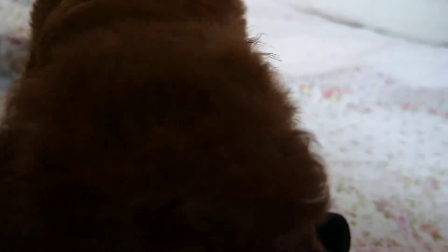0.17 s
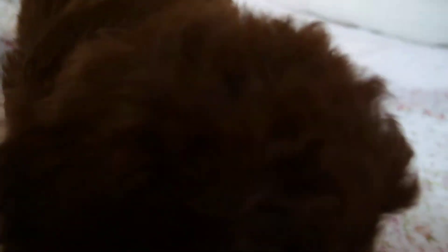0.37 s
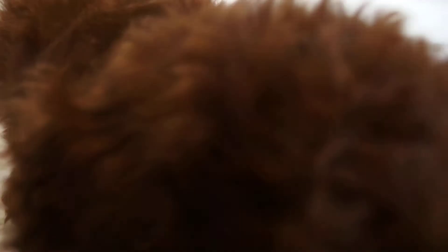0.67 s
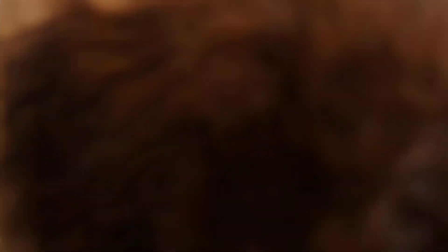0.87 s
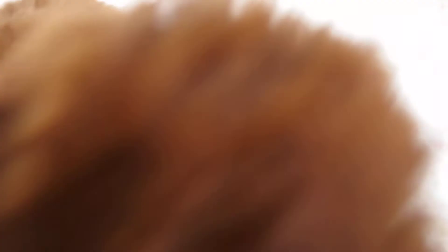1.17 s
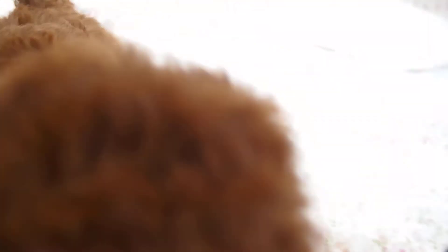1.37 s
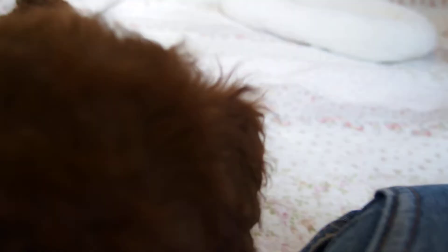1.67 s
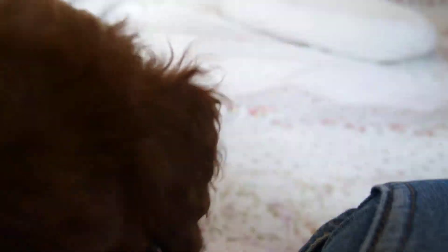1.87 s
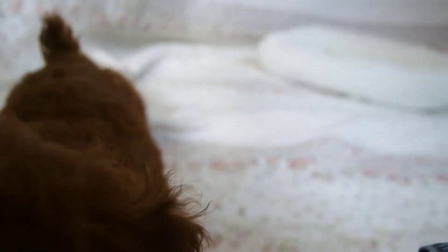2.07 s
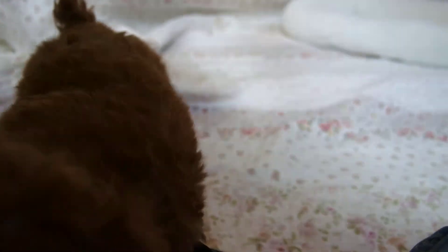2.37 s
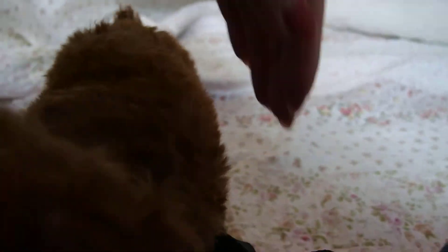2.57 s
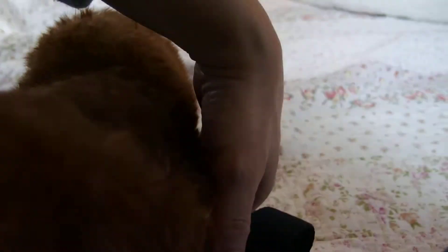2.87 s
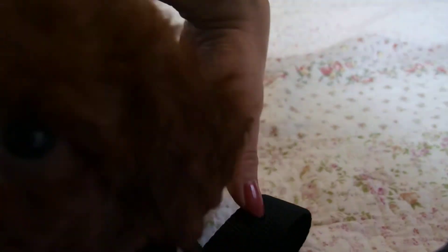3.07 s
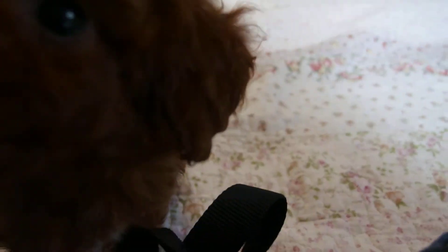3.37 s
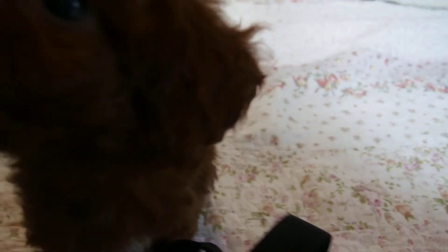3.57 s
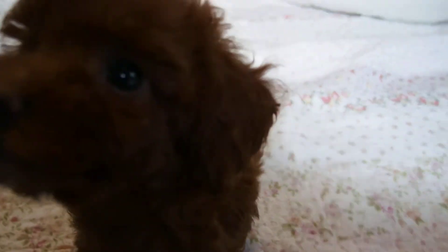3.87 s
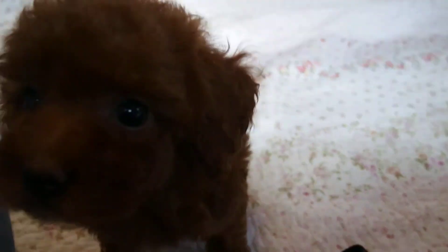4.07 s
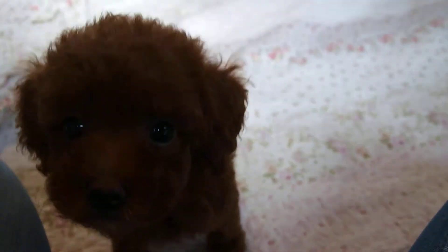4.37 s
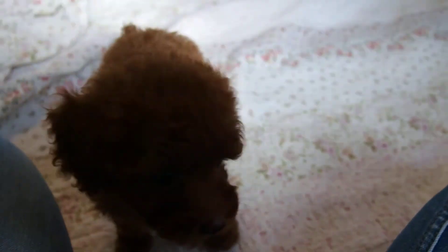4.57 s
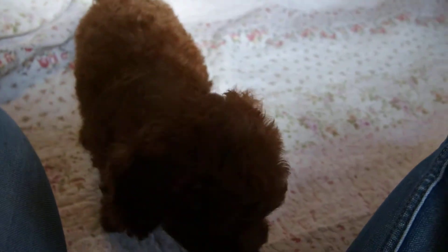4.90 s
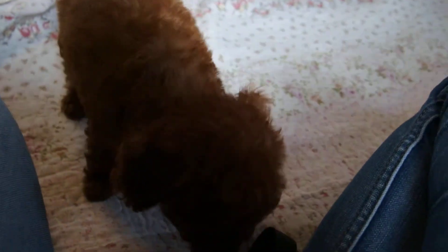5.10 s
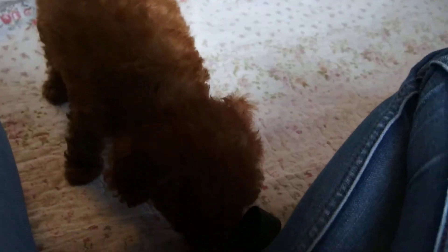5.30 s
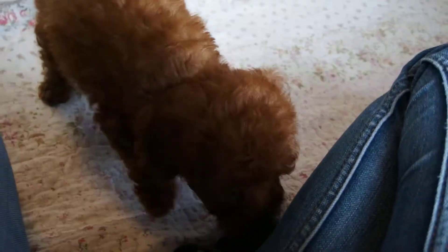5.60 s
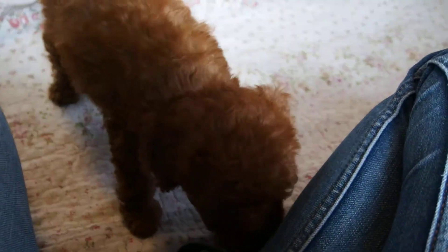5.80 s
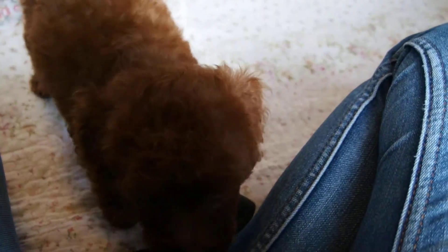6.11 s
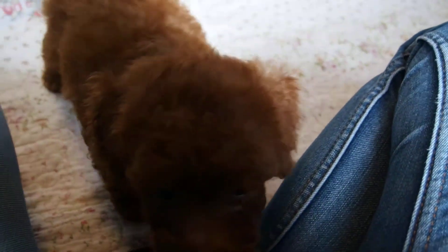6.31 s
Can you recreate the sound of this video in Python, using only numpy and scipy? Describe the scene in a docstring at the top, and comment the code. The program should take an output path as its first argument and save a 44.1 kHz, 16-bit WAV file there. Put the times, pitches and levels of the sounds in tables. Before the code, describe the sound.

Low wavering hum, faint hiss and rapid soft mechanical ticking lie beneath a small dog moving on bedding. Two sharp taps come early, then a heavy knock with a fur scrape and muffled paw thuds. Later the mouth pops wetly, and irregular hard bites click and scrape on a strap. The end is quieter, with light cloth rasp; dry indoor closeness, the level dipping after loud clicks.

```python
"""Puppy nibbling a strap

A puppy shuffles over a quilt beside a hand-held camera, brushes and knocks it, smacks its lips, bites
and pulls a strap, then rubs denim. Rubbing is grains over filtered noise; contacts are bursts through
resonators; pops and paw steps are enveloped sines. Motor hum, rumble, hiss, a whine, lens ticks and two
late thin tones run behind. Automatic gain ducks after sharp clicks."""
import sys
import numpy as np
from scipy import signal
from scipy.fft import rfft, irfft, next_fast_len
from scipy.io import wavfile
from scipy.ndimage import uniform_filter1d, map_coordinates

SR = 44100
rng = np.random.default_rng(int(sys.argv[2]) if len(sys.argv) > 2 else 0)


def int16_out(signal):
    """Quantize to a 16-bit WAV file."""
    q = np.round(np.clip(np.atleast_2d(signal).T, -1, 1) * 32767)
    wavfile.write(sys.argv[1], SR, q.astype(np.int16))


N = 284423
TIME = np.arange(N) / SR
HIT_SAMPLES = 2048
HIT_TIME = np.arange(HIT_SAMPLES) / SR

# stereo width of the room: f/Hz, side over mid/dB
ROOM_WIDTH = [(60, -8.5), (110, -19.5), (200, -14), (380, -11.5), (700, -6), (1290, -4), (2380, -2),
              (4400, -2), (8120, 0), (15000, 2.5)]
# strap pulled through the mouth: start/s, length/s, level/dB
PULLS = [(4.055, 0.0067, -37.5), (4.106, 0.023, -37.5), (4.166, 0.092, -43.5), (4.222, 0.053, -38.5),
         (4.334, 0.053, -44.5), (4.407, 0.12, -43), (4.859, 0.025, -39), (4.932, 0.045, -48),
         (5.05, 0.037, -49.5), (5.297, 0.034, -44), (5.673, 0.0066, -32), (5.834, 0.031, -37.5)]
# ring of the bitten strap: f/Hz, width/Hz, level/dB
STRAP_RING = [(3816, 520, 0)]
# low body of a bite: f/Hz, width/Hz, level/dB
NIP_BODY = [(584, 1010, 11), (1230, 530, 11.5), (3180, 356, 11.5)]


def from_db(db):
    """Decibels to amplitude gain."""
    return 10 ** (np.asarray(db) / 20)


def rms_one(x):
    """Scale to rms 1."""
    return x / np.sqrt(np.mean(x ** 2) + 1e-20)


def height_one(x):
    """Scale a hit so that its loudest millisecond has rms 0.5, a crest near 1."""
    return x / (2 * np.sqrt(uniform_filter1d(x ** 2, size=44).max()) + 1e-12)


def panned(pan_db):
    """Left and right gains; positive is left."""
    return from_db([[pan_db / 2], [-pan_db / 2]])


def at_hz(points, hz):
    """Read a spectrum on a log-frequency axis."""
    f, value = np.transpose(points)
    return np.interp(np.log(hz + 1), np.log(f), value)


def drift(knots_per_s):
    """Slow random curve of rms 1: straight lines between normal draws."""
    knots = rng.standard_normal(4000)
    return rms_one(np.interp(TIME * knots_per_s, np.arange(len(knots)), knots))


def stereo_noise():
    """Two independent white noises."""
    return rng.standard_normal((2, N))


def coloured(pair, colour, width):
    """Shape two excitations as mid and side by spectrum and width; left/right out at rms 1."""
    size = next_fast_len(N)
    hz = np.arange(size // 2 + 1) * SR / size + 0.0012
    low_hz, high_hz = colour[0][0], colour[-1][0]
    skirts = 1 / np.sqrt((1 + (low_hz / hz) ** 8) * (1 + (hz / high_hz) ** 8))
    mid, side = rfft(pair, size) * from_db(at_hz(colour, hz)) * skirts
    side = side * from_db(at_hz(width, hz))
    return rms_one(irfft([mid + side, mid - side], size)[:, :N])


def resonate(x, modes):
    """Parallel two-pole resonances (f/Hz, width/Hz, gain/dB) with alternating signs."""
    out = 0
    for k, (hz, width_hz, db) in enumerate(modes):
        r = np.exp(-np.pi * width_hz / SR)
        zeros = np.array([1, 0, -1]) * (1 - r * r) / 2
        poles = [1, -2 * r * np.cos(2 * np.pi * hz / SR), r * r]
        out = out + (-1) ** k * from_db(db) * signal.lfilter(zeros, poles, x)
    return out


def ring(slips, modes):
    """Modes at set relative rms levels, each a narrow then a wide resonance in series; rms 1."""
    out = 0
    for k, (hz, width_hz, db) in enumerate(modes):
        tone = resonate(resonate(slips, [(hz, width_hz, 0)]), [(hz, 4 * width_hz, 0)])
        out = out + (-1) ** k * from_db(db) * rms_one(tone)
    return rms_one(out)


def burst(decay_s, tail_db, rise_share):
    """A contact lets go in a quick run of tiny slips, with a faint trailing scuff."""
    decay_s = max(decay_s, 1e-4)
    snap = (1 - np.exp(-HIT_TIME / (rise_share * decay_s))) * np.exp(-HIT_TIME / decay_s)
    tail = from_db(tail_db) * np.exp(-HIT_TIME / 0.012)
    return rng.choice([-1, 1], HIT_SAMPLES) * (snap + tail)


def spurt(length_s, rise_share):
    """Random-sign jitter that swells and dies along Gaussian curves."""
    t = HIT_TIME / max(length_s, 5e-4)
    return rng.choice([-1, 1], HIT_SAMPLES) * (1 - np.exp(-(t / rise_share) ** 2)) * np.exp(-t ** 2)


def first_crack(slips, decay_s):
    """Weight the first instant of a contact, which excites the highest frequencies."""
    return slips * np.exp(-HIT_TIME / max(decay_s, 2e-4))


def chime(modes, length_s):
    """A soft push sounds each mode, a little off pitch every time, and dies away; rms 1."""
    tones = 0
    for hz, width_hz, db in modes:
        sung_hz = hz + 0.39 * width_hz * rng.normal()
        tones = tones + from_db(db) * np.sin(2 * np.pi * (sung_hz * HIT_TIME + rng.random()))
    swell = 1 - np.exp(-(HIT_TIME / 0.0048) ** 2)
    return rms_one(tones * swell * np.exp(-(HIT_TIME / max(length_s, 1e-3)) ** 2))


def add(out, s, hit, pan_db=0, lag_samples=0):
    """Place a hit at s seconds; the right channel lags the left."""
    i = max(int(s * SR), 0)
    late = map_coordinates(hit, [np.arange(len(hit)) - lag_samples], order=3)
    pair = np.array([hit, late]) * panned(pan_db)
    out[:, i:i + len(hit)] += pair[:, :max(N - i, 0)]


def strokes(rows, rise_db_per_s, fall_db_per_s):
    """Level in dB: each stroke rises, holds and falls; the strongest counts."""
    levels = []
    for s, length_s, db in rows:
        before_db = rise_db_per_s * np.maximum(s - TIME, 0)
        after_db = fall_db_per_s * np.maximum(TIME - s - length_s, 0)
        levels.append(db - before_db - after_db)
    return np.max(levels, axis=0).clip(-150, 0)


def rub(level_db, colour, grains_per_s, grain_db, smooth_db, flutter_db, pan_db):
    """Fibres catch and let go: uneven grains over a smooth hiss, under a fluttering pressure."""
    # stereo width of close rubbing: f/Hz, side over mid/dB
    rub_width = [(60, -5), (110, -13), (200, -29), (380, -36), (700, -22), (1290, -15), (2380, 1.5),
                 (4400, -2.5), (8120, 0), (15000, 5)]
    sizes = from_db(grain_db * np.minimum(rng.exponential(1, N), 2.5))
    caught = rng.random(N) < grains_per_s / SR
    grains = rms_one(sizes * caught * rng.choice([-1, 1], (2, N)))
    pressure = from_db(flutter_db * np.tanh(drift(130)))
    friction = (grains + from_db(smooth_db) * stereo_noise()) * pressure
    return from_db(level_db) * coloured(friction, colour, rub_width) * panned(pan_db)


def contacts(rows, ring_modes, body_modes, decay_s, detune=0):
    """Ring over low body; brightness adds upper ring and treble snap; a bite also rings the jaws."""
    # upper ring, treble snap, hollow of the jaws: f/Hz, width/Hz, level/dB
    upper_modes = [(5170, 1000, -11), (5450, 3800, -10)]
    treble_modes = [(7940, 1960, 6.5), (12400, 8200, 5)]
    jaw_modes = [(2180, 510, -0.5), (3020, 510, 1), (4420, 540, 1)]
    out = np.zeros((2, N))
    for s, db, body_db, bright_db, pan_db, *jaws in rows:
        slips = burst(decay_s, tail_db=-30.0, rise_share=0.091)
        body = from_db(body_db) * ring(slips, body_modes)
        pitch = 1 + detune * rng.uniform(-0.44, 1)
        tuned = [(hz * pitch, width_hz, g) for hz, width_hz, g in ring_modes]
        upper_db = -4 + 0.77 * bright_db
        top = from_db(2.5) * ring(slips, tuned) + from_db(upper_db) * ring(slips, upper_modes)
        top = top + from_db(bright_db) * ring(first_crack(slips, decay_s=.0008), treble_modes)
        scale = from_db(db) * np.std(height_one(top + body)) / np.std(top + body)
        add(out, s, scale * top, pan_db, lag_samples=1.6)
        # body further left than ring, jaws slightly further right
        add(out, s, scale * body, pan_db + 12, lag_samples=4.4)
        for jaw_db in jaws:
            add(out, s, scale * from_db(jaw_db) * ring(slips, jaw_modes), pan_db - 1, lag_samples=-3.5)
    return out


def bedroom(x, t60_s, wet_db, dull_hz):
    """A weak diffuse tail of decaying noise, dulled by the bedding."""
    t = TIME[:SR // 2]
    tail = rng.standard_normal((2, len(t))) * from_db(-60 * t / t60_s) * (t > .004)
    tail = signal.sosfilt(signal.butter(2, min(dull_hz, 18000), fs=SR, output="sos"), tail)
    tail /= np.sqrt(np.sum(tail ** 2) / 2)
    return x + from_db(wet_db) * signal.fftconvolve(x, tail, axes=1)[:, :N]


def background():
    """Wavering motor-hum partials, filtered-noise rumble and hiss, and a thin electronic whine."""
    # partials of two motors, before the swell: f/Hz, rms level/dB
    partials = [(42.03, -39), (34.6, -93), (64.64, -52), (72.1, -49.5), (81, -75), (99.55, -50),
                (202.5, -59.5), (313.6, -68.5), (360.5, -68.5)]
    # hum swell: t/s, gain/dB
    hum_swell = [(0, 5), (1.5, 0.5), (2.6, 2), (3.6, 2), (5.6, 1), (5.88, 0.5), (6.02, -4.5), (6.45, -2)]
    # room rumble; room air and microphone hiss: f/Hz, level per Hz/dB
    rumble_colour = [(20, -35), (32, 12.5), (52, -2.5), (68, 3), (85, 4.5), (102, 2), (122, -7), (175, -12),
                     (210, -5), (270, -17.5), (350, -19.5), (480, -48)]
    air_colour = [(240, -58), (400, 9.5), (520, 9), (708, 6.5), (1090, -0.5), (1220, 8), (1350, -9),
                  (1510, 1), (1820, -4.5), (2590, -8), (5190, -5), (8240, -12), (13900, -6), (15000, -7),
                  (16000, -2)]
    swell_s, swell_gain_db = np.transpose(hum_swell)
    swell_db = np.interp(TIME, swell_s, swell_gain_db)
    hum = 0
    for hz, db in partials:
        wavering_s = TIME + 0.00046 * drift(4.4)
        hum = hum + from_db(db) * np.sqrt(2) * np.sin(2 * np.pi * hz * wavering_s)
    rumble = from_db(-38.5) * coloured(stereo_noise(), rumble_colour, ROOM_WIDTH)
    air = from_db(-54.5) * coloured(stereo_noise(), air_colour, ROOM_WIDTH)
    whine = from_db(-66) * rms_one(resonate(stereo_noise(), [(15614, 26, 0)]))
    # rumble and air follow only the sinking part of the swell
    sink_db = 1.2 * np.minimum(swell_db, 0)
    return from_db(swell_db) * hum + from_db(sink_db) * (rumble + air) + whine


def quilt():
    """Shifting weight rumbles, crumples folds in surges and sets the hand-held camera booming."""
    # weight shifts: start/s, length/s, level/dB
    shifts = [(0, 1.7, -52), (.42, 0.099, -40), (1.7, 0.55, -36), (2.1, 0.92, -37.5), (3.05, 0.95, -48),
              (6.21, 0.01, -40.5)]
    # rumble and fold spectra: f/Hz, level per Hz/dB
    shuffle_colour = [(65, -23), (110, -4), (167, -3), (274, -12.5), (310, -12), (393, -23), (712, -30),
                      (1030, -32), (1240, -37), (1850, -36.5), (1980, -52), (2370, -40.5), (3000, -45.5),
                      (3900, -63), (6600, -120)]
    fold_colour = [(280, -0.5), (700, 0.5), (1250, -5), (2000, -24)]
    level_db = strokes(shifts, rise_db_per_s=136, fall_db_per_s=96)
    surge = np.tanh(drift(28))
    surging = stereo_noise() * from_db(5.3 * surge)
    boom = rms_one(resonate(resonate(surging[0], [(176.0, 18, 0)]), [(154, 31, 0)]))
    rumble = from_db(-2.5) * coloured(surging, shuffle_colour, ROOM_WIDTH) + from_db(-25.0) * boom
    folds = rub(level_db - 17 + 3.5 * surge, fold_colour, grains_per_s=42, grain_db=2.0,
                smooth_db=9.5, flutter_db=-2.5, pan_db=-1.5)
    return from_db(level_db) * rumble * panned(1.8) + folds


def focus():
    """The lens hunts in about fifteen small steps a second; each rings its barrel."""
    # runs of steps: start/s, level/dB, middle modes/dB, 860 Hz knock/dB
    runs = [(0, -43, 2.5, -2), (1.15, -42.5, -3, -2), (3.0, -43, -10.5, 0), (3.7, -41, -5, -2.5),
            (5.95, -75, -8, 4)]
    # barrel modes: f/Hz, width/Hz, level/dB
    low_modes = [(689, 122, -4.5), (860, 170, -4.5)]
    middle_modes = [(1302, 204, 8.5), (1865, 170, 3)]
    high_modes = [(2326, 34, 6.2), (3480, 780, 12.6), (5550, 1400, 6.3)]
    # louder steps with a stronger knock: t/s
    loud_steps = [3.173, 3.306]
    first_s, step_s = .036, .06674
    out = np.zeros((2, N))
    for s in np.arange(first_s, N / SR, step_s):
        _, db, middle_db, knock_db = runs[sum(s >= run[0] for run in runs[1:])]
        loud_db = 7 * any(abs(s - loud_s) < step_s / 2 for loud_s in loud_steps)
        push = spurt(0.018, rise_share=0.13)
        knock = from_db(knock_db + loud_db / 2) * ring(push, low_modes[1:])
        low = rms_one(chime(low_modes[:1], length_s=0.021) + knock)
        middle = from_db(middle_db) * chime(middle_modes, length_s=0.011)
        high = from_db(-6.5) * ring(push, high_modes)
        add(out, s, from_db(db + loud_db) * height_one(low + middle + high), pan_db=4.0)
    return out


def after_ring(hz):
    """A thin sine of rms near 1 at its start hangs on after a pop and dies away."""
    t = TIME[:SR // 3]
    t60_s = .26
    return np.sqrt(2) * np.sin(2 * np.pi * hz * t) * (1 - np.exp(-t / .004)) * from_db(-60 * t / t60_s)


def smacks():
    """Lips part with a soft thump: the mouth cavity pops while the wet film bursts brightly."""
    # t/s, level/dB, mouth f/Hz, spray/dB, spray f/Hz, thump/dB, 5 kHz ring/dB, left-right/dB
    smack_rows = [(0.393, -47, 2320, 3.5, 9700, -20, -6, 0), (0.502, -44, 2120, 3, 9900, -24, -8, -1),
                  (3.816, -12, 1925, 3.5, 9200, -15.5, -4.5, 2.5),
                  (3.957, -37, 2380, -20.5, 9500, -4, -28, -4),
                  (3.9861, -14.5, 1810, 5, 9440, -14, -11.5, 3),
                  (3.9884, -18, 2270, -8, 9600, -13, -19, -3), (4.628, -39, 1850, -14, 9650, 0, -21, 0.5),
                  (4.7649, -9, 1523, -7, 9900, -11.5, -21.5, 0),
                  (4.881, -26.5, 1840, -12, 11220, -5, -26, -12),
                  (4.889, -25, 1600, -15, 11300, -5, -30, 8),
                  (4.8917, -15.5, 1730, -9.5, 11400, -11, -40, -3),
                  (4.895, -25, 1180, -9, 11300, -3.5, -25, -2)]
    sag, sag_s, pop_cycles = 0.055, 0.00047, 7.3
    out = np.zeros((2, N))
    for s, db, mouth_hz, spray_db, spray_hz, thump_db, high_ring_db, pan_db in smack_rows:
        film = spurt(length_s=0.0054, rise_share=0.016)
        # pitch starts sharp and settles as the mouth opens
        turns = mouth_hz * (HIT_TIME + sag * sag_s * (1 - np.exp(-HIT_TIME / sag_s)))
        pop_shape = (1 - np.exp(-HIT_TIME / 0.00031)) * np.exp(-(turns / pop_cycles) ** 2)
        pop = rms_one(np.sin(2 * np.pi * turns) * pop_shape)
        cavity = pop + from_db(-11) * ring(film, [(mouth_hz, 750, 0)])
        thump = from_db(thump_db) * ring(film, [(654, 580, 0)])
        high_ring = from_db(high_ring_db) * ring(film, [(5130, 280, 8.5), (6280, 310, 0.5)])
        spray_modes = [(spray_hz, 1700, 0), (12700, 1700, -8)]
        spray = from_db(spray_db) * ring(first_crack(film, decay_s=0.0027), spray_modes)
        scale = from_db(db) * np.std(height_one(cavity))
        add(out, s, scale * (cavity + thump), pan_db, lag_samples=0.29)
        add(out, s, scale * (high_ring + spray), pan_db, lag_samples=0.8)
        add(out, s, scale * from_db(-18) * after_ring(1.03 * mouth_hz), pan_db)
    return out


def paws():
    """A paw sinks in slowly and the mattress booms: a wavering sine under a Gaussian swell."""
    # time of maximum/s, peak/dB, f/Hz, Gaussian length/s
    steps = [(.51, -31, 164, 0.027), (1.66, -33.5, 156, 0.043), (1.77, -32.5, 159, 0.035),
             (1.96, -33.5, 162.5, 0.16), (2.167, -27, 117, 0.015), (2.38, -39, 169.1, 0.13),
             (2.402, -37, 221, 0.016), (2.562, -37, 222, 0.017), (2.96, -49, 177, 0.015)]
    out = np.zeros((2, N))
    for s, db, hz, length_s in steps:
        t = TIME - s
        boom = np.sin(2 * np.pi * hz * t + 0.31 * drift(30) + rng.uniform(0, 2 * np.pi))
        out += from_db(db) * boom * np.exp(-(t / length_s) ** 2)
    return out


def fur():
    """Fur brushes the camera in fine grains; hard strokes add a treble sizzle."""
    # brush strokes: start/s, length/s, level/dB
    brushes = [(.515, 0.012, -61), (1.345, 0.04, -52.5), (1.62, .09, -51.5), (1.72, .05, -48),
               (1.812, 0.041, -35), (2.03, .04, -53), (2.18, 0.24, -47.5), (2.84, 0.13, -58)]
    # fur and sizzle spectra: f/Hz, level per Hz/dB
    fur_colour = [(530, -33), (900, -35), (1790, -2.5), (2190, -12.5), (3150, -9), (3910, 0.5), (4310, -5),
                  (5280, -3.5), (8660, -18), (9880, -13.5), (13200, -23), (15100, -20), (16000, -55)]
    sizzle_colour = [(6500, 0), (10000, -3), (15000, -6)]
    brush_db = strokes(brushes, rise_db_per_s=236, fall_db_per_s=760)
    brushing = rub(brush_db, fur_colour, grains_per_s=2600, grain_db=-4.5,
                   smooth_db=-9.5, flutter_db=4.0, pan_db=-1.5)
    sizzle_db = -39.5 + 1.53 * (brush_db - brush_db.max())
    sizzle = rub(sizzle_db, sizzle_colour, grains_per_s=8200, grain_db=7.0,
                 smooth_db=-9, flutter_db=4.0, pan_db=5.0)
    return brushing + sizzle


def ticks():
    """Claws and teeth tick against the camera as hard contacts."""
    # t/s, level/dB, body/dB, brightness/dB, left-right/dB
    tick_rows = [(1.0072, -34.5, 2, -12, -13), (1.1155, -4, -9.5, 1, 3.5), (1.2091, -11, -10.5, -3.5, -5),
                 (1.7644, -25.5, -2.5, -25, -8), (1.826, -11, -1, -17, -7), (2.0985, -25.5, 16, -32, -16),
                 (2.1512, -28, 11, 6, -3), (3.629, -39, -20, 20, 14), (6.027, -43.5, -25, -1, -4)]
    # ring and body: f/Hz, width/Hz, level/dB
    tick_ring = [(3910, 290, 1), (5330, 810, 0)]
    tick_body = [(393, 1160, 5.5), (1380, 1840, 8.5), (2510, 450, 6.5)]
    return contacts(tick_rows, tick_ring, tick_body, decay_s=0.0014)


def bumps():
    """Dull knocks boom the camera shell, with a rattle of higher modes and a scuff of fur."""
    # t/s, level/dB, resonance/Hz, left-right/dB, decay/s, scuff/dB
    bump_rows = [(1.1137, -27, 320, 17, 0.0004, -22), (1.2095, -30, 620, -12, 0.00081, -1),
                 (1.587, -34.5, 540, -0.5, 0.0016, 17), (1.826, -15.5, 674, 4.5, 0.0017, -28),
                 (2.097, -33, 640, 10, 0.003, 7), (2.151, -32, 750, 10, 0.0033, 3),
                 (2.834, -33, 490, 2, 0.0025, 1), (3.643, -30, 526, -3, 0.0018, 0),
                 (3.718, -41.5, 850, 6, 0.0017, -15), (6.1, -41, 666, 5, 0.0035, 3),
                 (6.212, -44, 774, 16, 0.0038, 0), (6.226, -33, 723, 7, 0.0015, 1),
                 (6.269, -49, 1000, 12, 0.0027, -5)]
    # shell modes: multiple of the resonance, width/Hz, level/dB
    shell = [(1, 115, 6), (1.1, 600, -1), (2.62, 164, -13), (3.6, 200, -9)]
    # scuff: f/Hz, width/Hz, level/dB
    scuff_modes = [(450, 220, 5.5), (980, 780, -1)]
    out = np.zeros((2, N))
    for s, db, hz, pan_db, decay_s, scuff_db in bump_rows:
        shape = (HIT_TIME / decay_s) ** 2 * np.exp(-HIT_TIME / decay_s)
        boom = rms_one(np.sin(2 * np.pi * hz * HIT_TIME) * shape)
        shell_modes = [(hz * ratio, width_hz, g) for ratio, width_hz, g in shell]
        rattle = ring(burst(decay_s, tail_db=-17, rise_share=0.98), shell_modes)
        scuff = from_db(scuff_db) * ring(spurt(length_s=0.011, rise_share=0.22), scuff_modes)
        add(out, s, from_db(db) * height_one(boom + from_db(-7.0) * rattle + scuff), pan_db)
    return out


def wander(x, share, knots_per_s):
    """The strap tightens and slackens: a varying playback rate slides its whole colour."""
    highpass = signal.butter(1, 2, "high", fs=SR, output="sos")
    speed = signal.sosfilt(highpass, drift(knots_per_s))
    at = np.arange(N) + share * np.cumsum(speed)
    return np.array([map_coordinates(side, [at], order=3) for side in x])


def strap(pull_db):
    """The strap slides through the mouth: sparse fibre grains over hiss, wandering in pitch."""
    # f/Hz, level per Hz/dB
    drag_colour = [(1290, -14), (2200, -16), (2750, -18), (3280, -1.5), (3900, 3.5), (4450, -3),
                   (5200, -13), (5700, -12), (7210, -18), (9480, -15.5), (10400, -19), (16000, -24)]
    sliding = rub(pull_db, drag_colour, grains_per_s=450, grain_db=-3.5,
                  smooth_db=-4, flutter_db=3.0, pan_db=-4.5)
    return wander(sliding, share=.04, knots_per_s=25)


def snags(pull_db, count):
    """Faint contacts at random moments, levels following the pull, each at its own pitch."""
    times = rng.uniform(PULLS[0][0], PULLS[-1][0], count)
    levels_db = np.interp(times, TIME, pull_db) + 8 + 3 * rng.uniform(-0.87, 1, count)
    body_db, bright_db, pan_db = -13.0, -7, -1
    rows = [(s, db, body_db, bright_db, pan_db) for s, db in zip(times, levels_db)]
    return contacts(rows, STRAP_RING, NIP_BODY, decay_s=0.0014, detune=.2)


def nips():
    """Teeth bite the strap: its ring, a low body and the hollow of the jaws."""
    # t/s, level/dB, body/dB, brightness/dB, left-right/dB, jaw ring/dB
    nip_rows = [(4.166, -31, -20, -2.5, 2, -22), (4.2372, -25, -22, -9, 7.5, -19),
                (4.3164, -31.5, -9, -6, -6, -14), (4.3525, -28.5, -22, 2, -6, -16),
                (4.447, -33, -14, 6.5, -2, -20), (4.465, -40, -20, 4, 2, -22),
                (4.503, -32, -20, 6, -7, -28), (4.5984, -35.5, -22, -3, -6, -26),
                (4.8494, -26, -6, -23, -7, -9), (4.9544, -27, -18, -1, -5, -18),
                (5.01, -32.5, -16, -2, -3, -17), (5.0383, -22, -15, -1, -4, -22),
                (5.0981, -27, -11, -18, -4, -26), (5.154, -25, -30, 3, 7, -20),
                (5.163, -14, -12, 5, -5, -16), (5.1873, -6, -16.5, 11, -3, -5.5),
                (5.1972, -27, -4, 3, 0, -15), (5.2128, -33, -10, -5, 0, -18), (5.2688, -39, -20, 1, 0, -22),
                (5.298, -23, -6, -8, 6, 4), (5.3005, -11, -15.5, -28, -3, -3),
                (5.3102, -32, -3, -19, 3, -2), (5.325, -30, -12, 12, -8, -7),
                (5.3513, -8.5, -13, -9.5, -3.5, -1), (5.4526, -20.5, -12, -2, 0, -40),
                (5.601, -20, -15, -33, -3.5, 2), (5.6412, -7, -17, 9.5, -5.5, -8.5),
                (5.6715, -12.5, -13.5, -15, -2.5, -6.5), (5.7755, -10, -22, -25, -4.5, -3.5),
                (5.81, -32.5, 8, -16, 8, -6), (5.8188, -15, -11, -2, -8.5, -9),
                (5.8428, -22.5, -8, -20, -2, -22), (5.8524, -20, -13, -14, -6, -12),
                (5.8616, -20, -18, 1, 2, -12), (5.8803, -12.5, -8.5, -5, -5, -13.5),
                (6.099, -33, 4.5, -11, -6, -1)]
    return contacts(nip_rows, STRAP_RING, NIP_BODY, decay_s=0.0017, detune=.1)


def ribs(per_s, depth_db):
    """The ribs of the denim weave pass one after another: a buzzing gain of rms 1."""
    return rms_one(from_db(depth_db * np.sin(2 * np.pi * per_s * TIME + 0.85 * drift(45))))


def denim():
    """The muzzle pushes along denim: a thin rasp of grains, modulated by the weave."""
    # start/s, length/s, level/dB
    pushes = [(6.098, .008, -46), (6.11, 0.12, -55), (6.208, 0.0097, -45), (6.22, 0.25, -52)]
    # f/Hz, level per Hz/dB
    rasp_colour = [(1290, -20), (1800, 6.5), (2330, -17), (2750, -5), (3300, 5), (3890, 7), (5240, -0.5),
                   (5650, 5), (5960, 6.5), (6700, -3), (8020, 0), (10600, -10.5), (11700, -27),
                   (15000, -20)]
    push_db = strokes(pushes, rise_db_per_s=2500, fall_db_per_s=900)
    rasp = rub(push_db, rasp_colour, grains_per_s=3500, grain_db=1.0,
               smooth_db=-7, flutter_db=0.0, pan_db=1.0)
    return rasp * ribs(per_s=110, depth_db=3.5)


def thin_tones():
    """Two faint, thin, rough tones near 3.3 and 6 kHz: noise through two resonances in series."""
    # start/s, length/s, f/Hz, level/dB
    tone_rows = [(6.104, 0.074, 3330, -59.5), (6.223, 0.27, 6020, -56.5)]
    width_hz = 180
    out = np.zeros((2, N))
    for s, length_s, hz, db in tone_rows:
        level_db = strokes([(s, length_s, db)], rise_db_per_s=600, fall_db_per_s=600)
        narrow = resonate(stereo_noise(), [(hz, width_hz, 0)])
        out += from_db(level_db) * rms_one(resonate(narrow, [(hz, 2 * width_hz, 0)]))
    return out


def scene():
    """The puppy close by, the room behind it."""
    pull_db = strokes(PULLS, rise_db_per_s=1000, fall_db_per_s=1100)
    room = background() + quilt() + focus()
    mouth = bedroom(smacks(), t60_s=.2, wet_db=-26, dull_hz=4960)
    knocks = ticks() + bumps() + snags(pull_db, count=70) + nips()
    knocks = bedroom(knocks, t60_s=0.033, wet_db=-33, dull_hz=5000)
    rubbing = fur() + strap(pull_db) + denim()
    return room + mouth + paws() + knocks + rubbing + thin_tones()


def gain_control(x, threshold_db, release_db_per_s, attack_s, slope):
    """Sharp treble peaks slip through, then the gain drops and creeps back."""
    bright = signal.sosfilt(signal.butter(1, 2500, "high", fs=SR, output="sos"), x)
    power = uniform_filter1d(np.mean(bright ** 2, axis=0), size=176)
    level_db = 10 * np.log10(np.abs(power) + 1e-12)
    # peak hold with a linear release in dB
    ramp_db = release_db_per_s * TIME
    over_db = slope * np.maximum(level_db - threshold_db, 0)
    held_db = np.maximum.accumulate(over_db + ramp_db) - ramp_db
    r = np.exp(-1 / (attack_s * SR))
    return x * from_db(-signal.lfilter([1 - r], [1, -r], held_db))


def record(dry):
    """Automatic gain, tanh-rounded peaks, then a steep low-pass."""
    ducked = gain_control(dry, threshold_db=-21.5, release_db_per_s=18, attack_s=0.027, slope=1.0)
    ceiling, cutoff_hz = .8, 16000
    rounded = ceiling * np.tanh(ducked / ceiling)
    return signal.sosfilt(signal.cheby1(12, .2, cutoff_hz, fs=SR, output="sos"), rounded)


dry = scene()
out = record(dry)
int16_out(out)
```